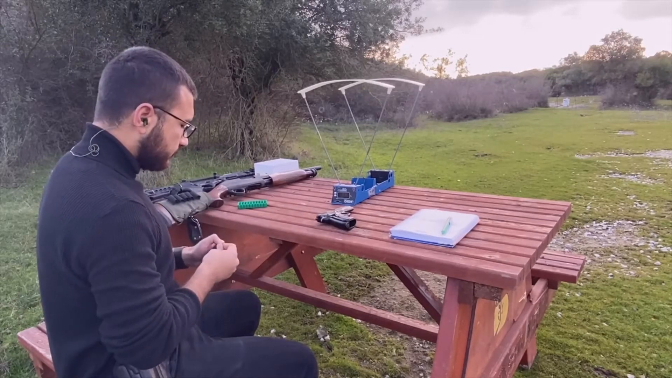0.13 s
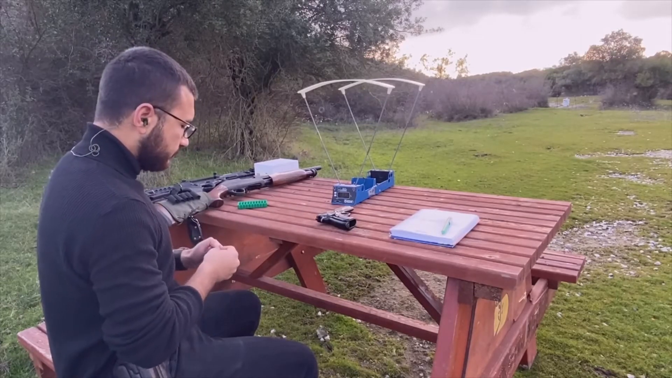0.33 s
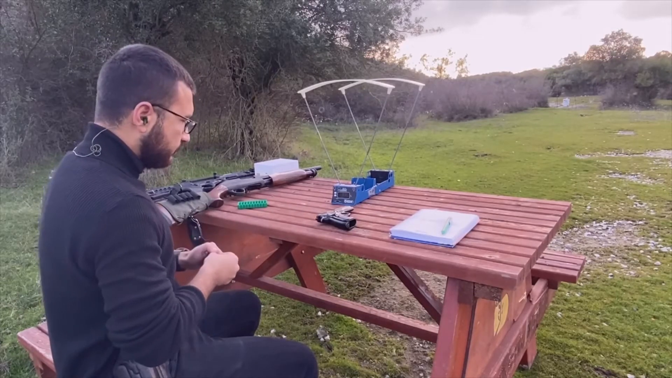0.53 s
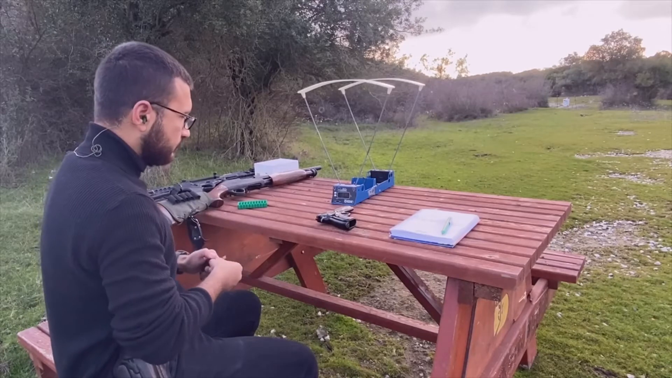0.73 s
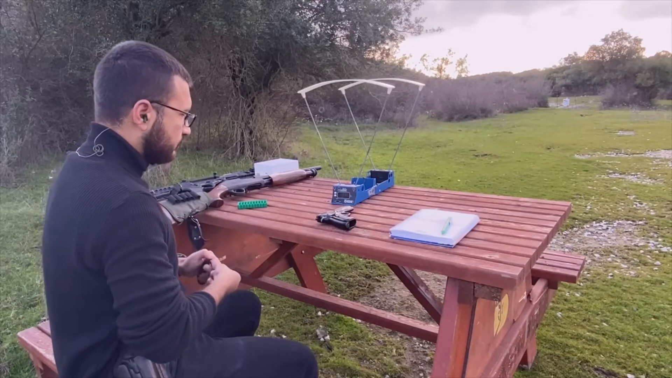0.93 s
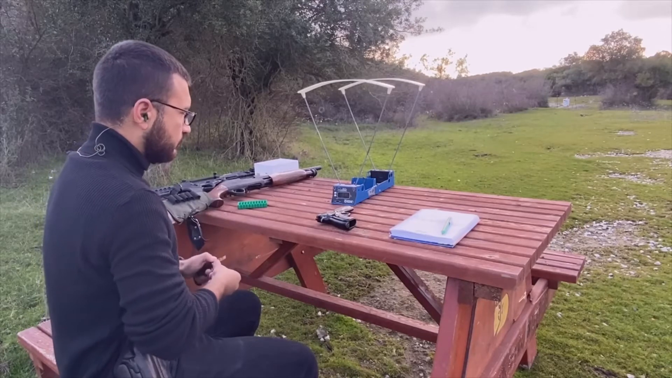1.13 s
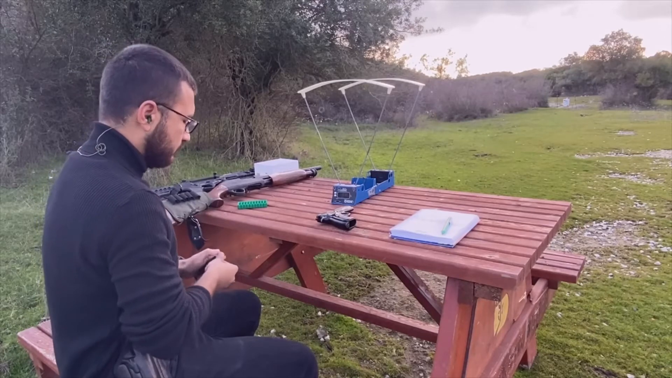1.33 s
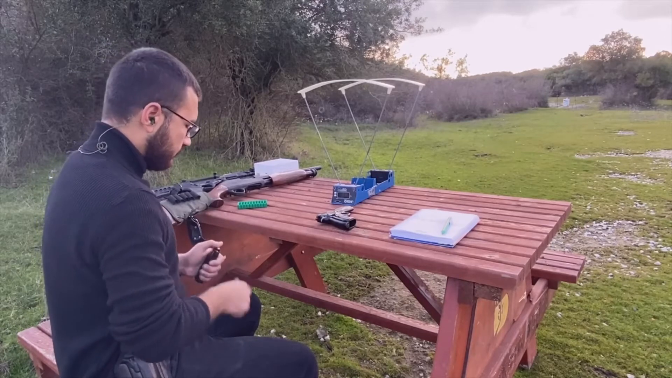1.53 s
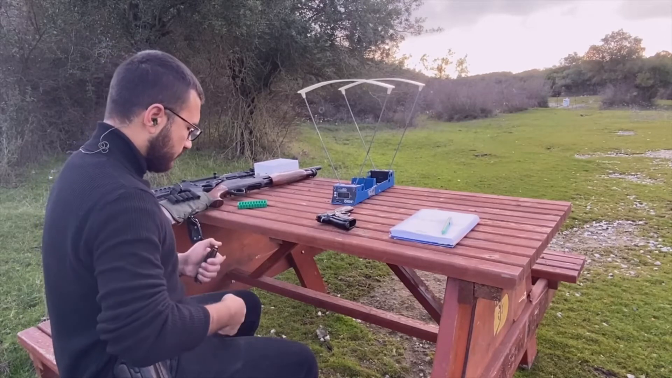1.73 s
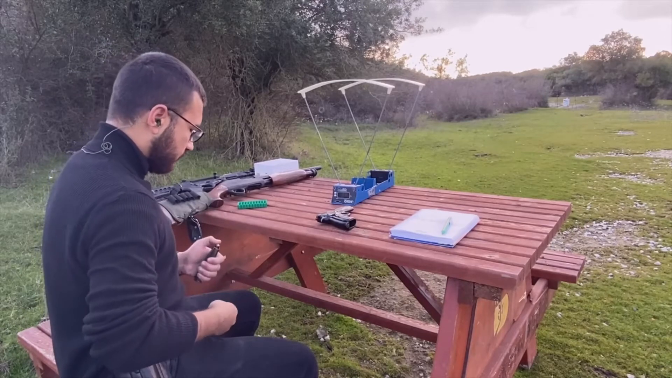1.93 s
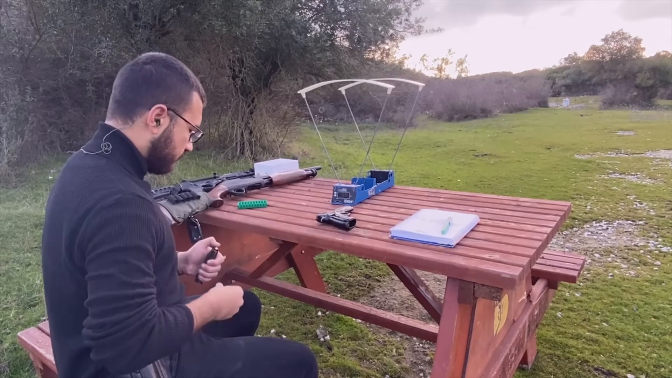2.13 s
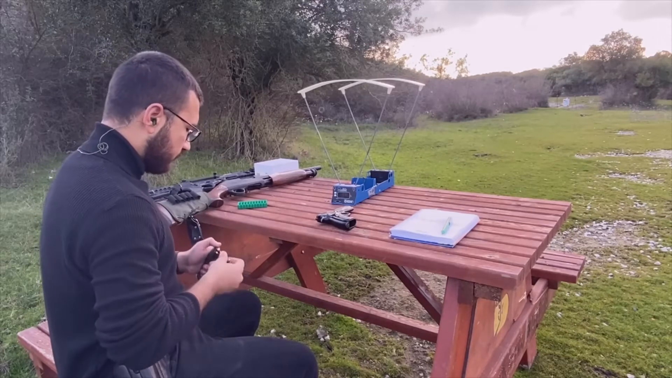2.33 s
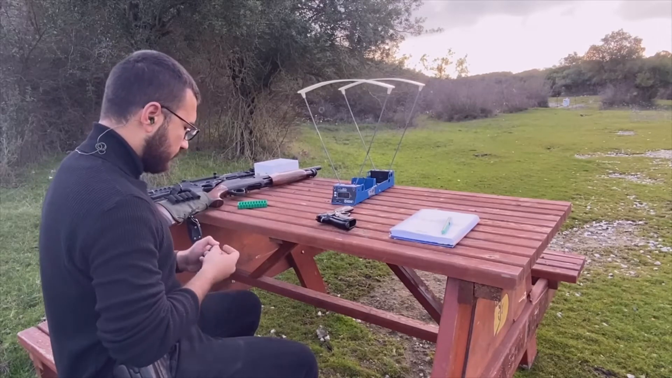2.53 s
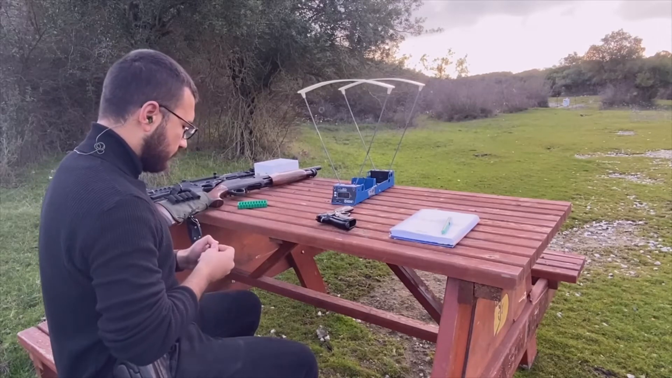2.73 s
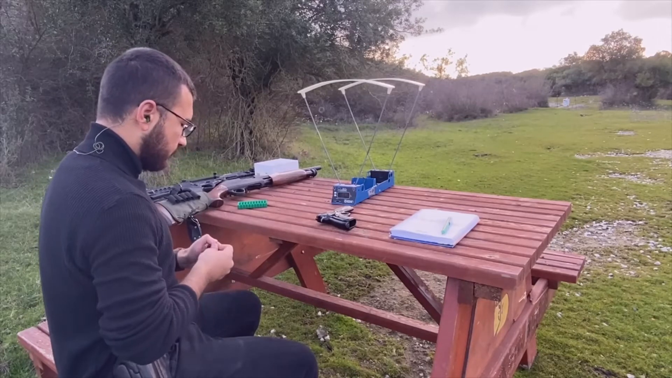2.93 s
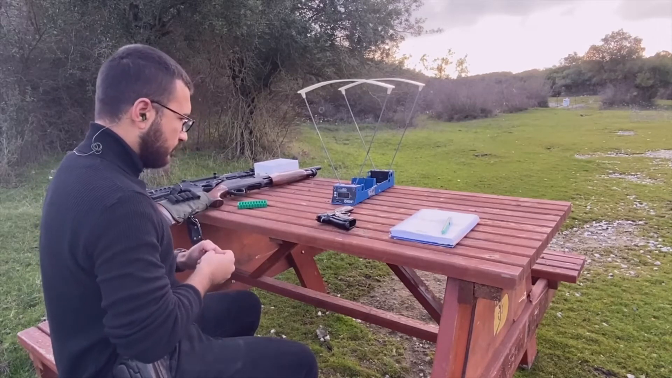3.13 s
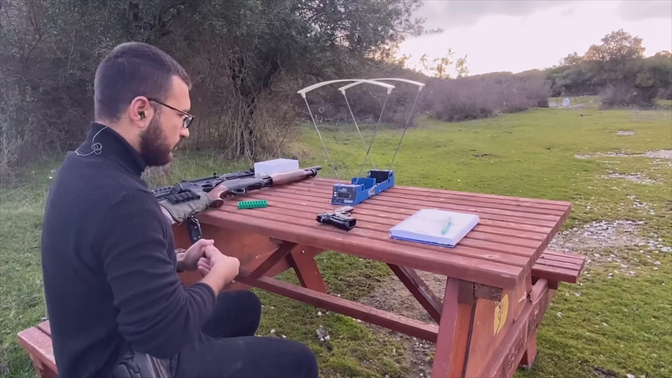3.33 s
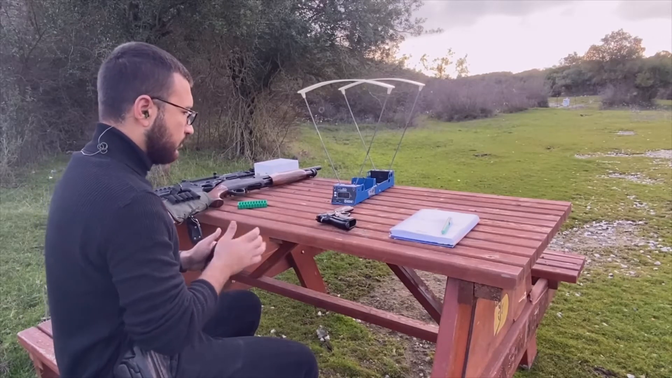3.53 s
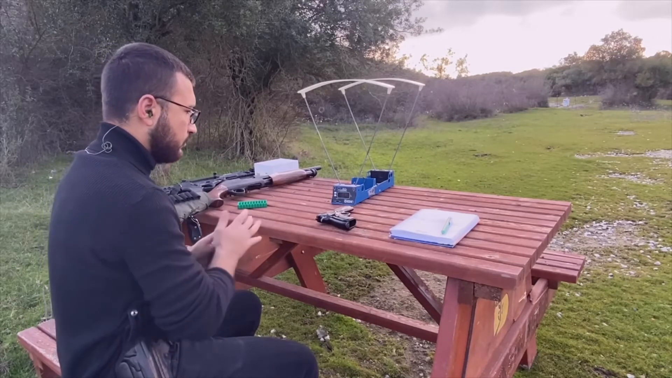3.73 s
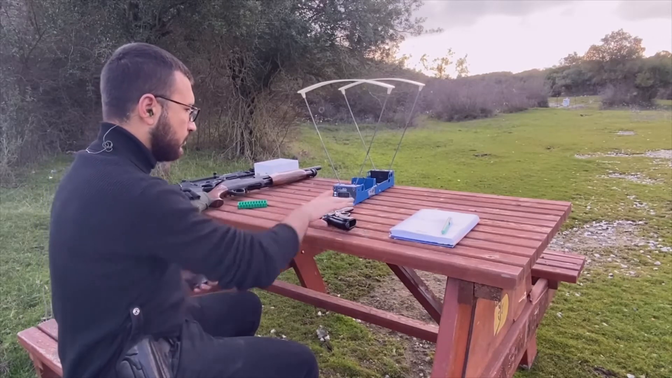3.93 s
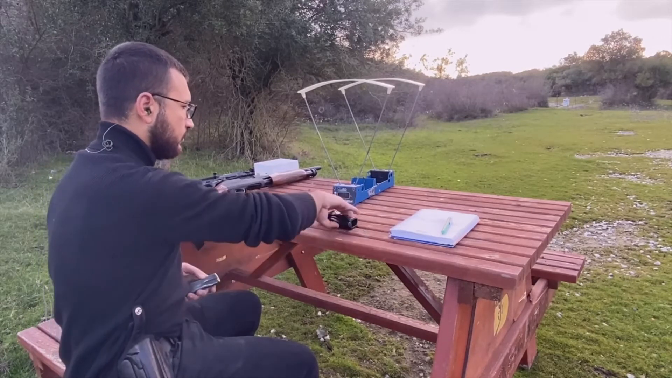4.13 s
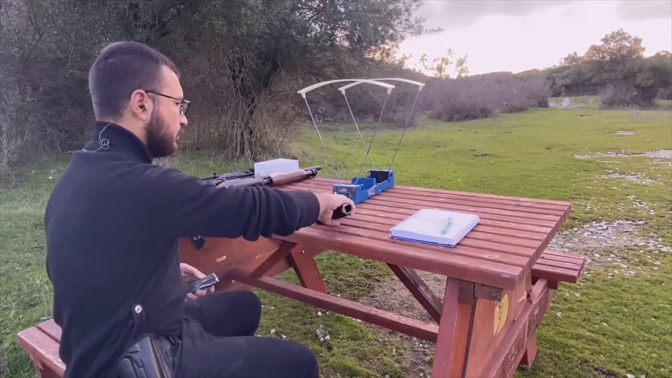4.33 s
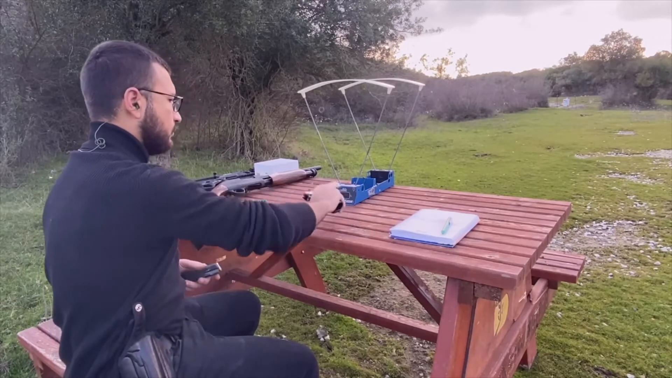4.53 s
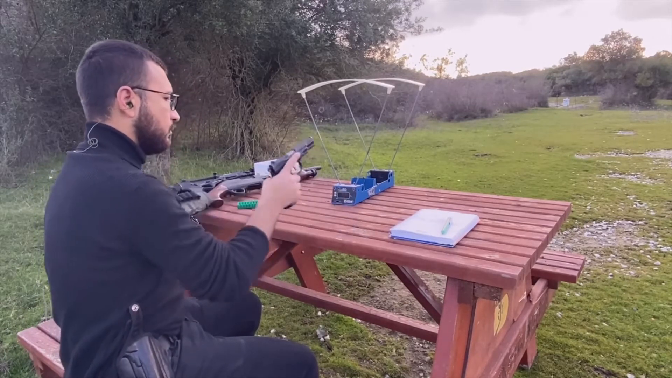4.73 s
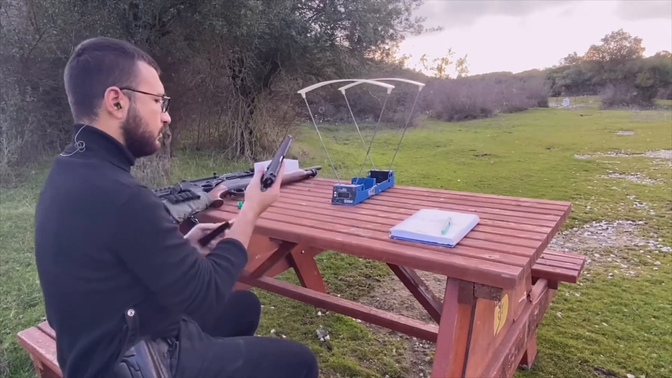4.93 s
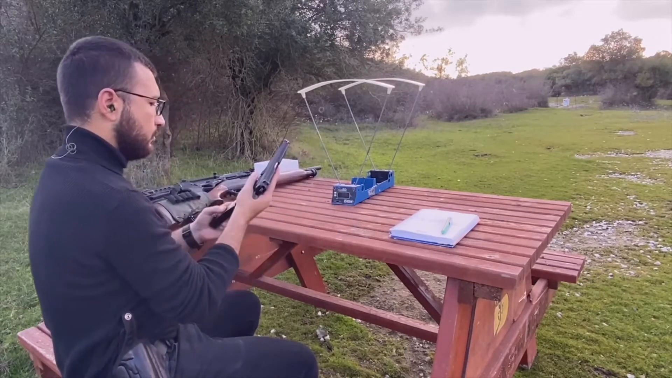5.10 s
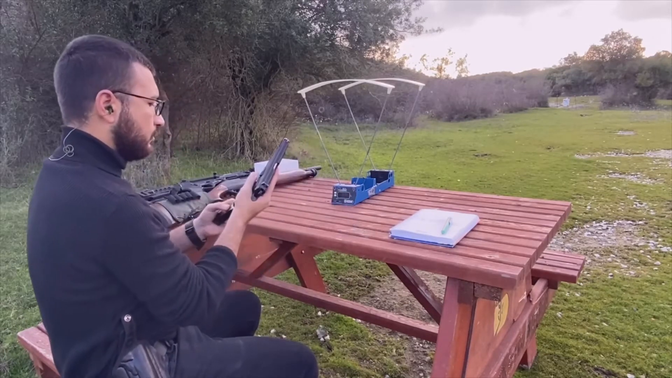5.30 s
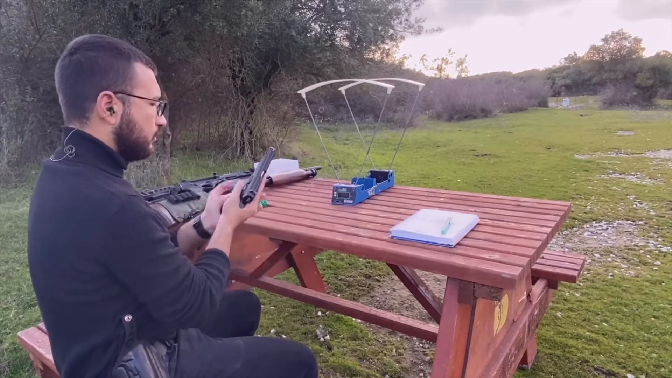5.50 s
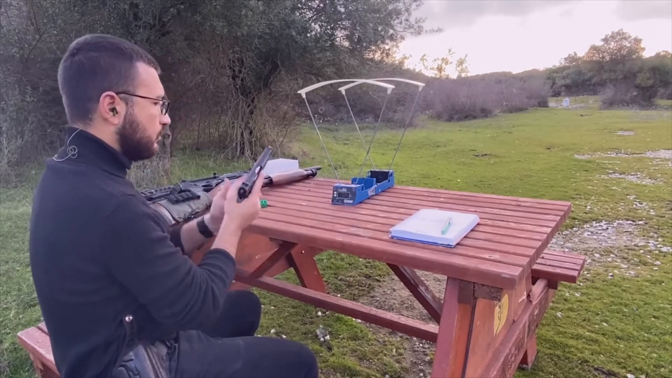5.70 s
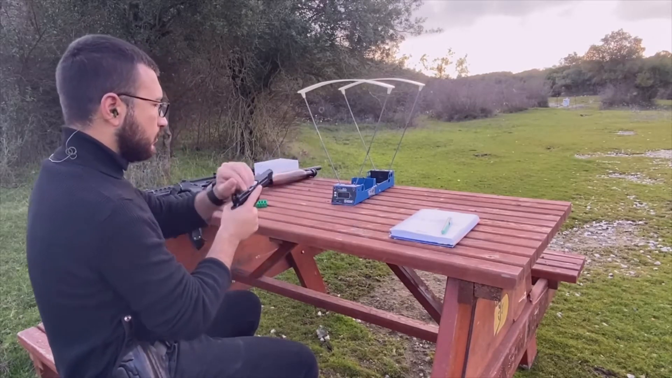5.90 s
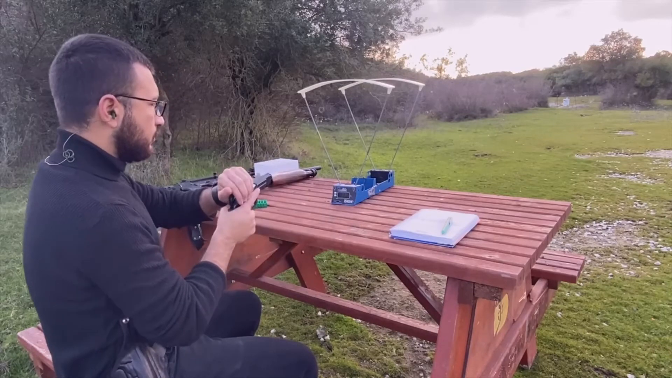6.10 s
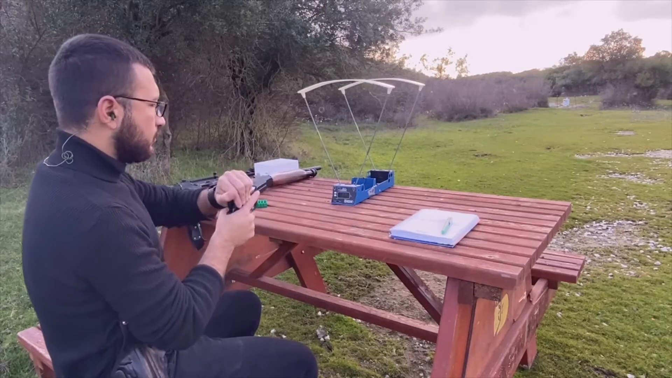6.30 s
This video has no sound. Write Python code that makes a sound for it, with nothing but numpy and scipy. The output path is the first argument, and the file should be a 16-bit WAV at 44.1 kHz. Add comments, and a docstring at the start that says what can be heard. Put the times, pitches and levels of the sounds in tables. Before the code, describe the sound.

At an outdoor wooden table, crisp irregular steel snaps and tiny ticks come from a magazine being loaded by hand. After soft cloth rubbing, a pistol is lifted with a short woody thud; light handling clicks follow, then a brief gritty slide and a loud latch clack, and a last bright snap. Nearby stereo microphone, slightly left, with soft wind rumble and a faint distant bird.

```python
"""Outdoors at a wooden table, cartridges are thumbed into a pistol magazine with sharp steel clicks.
The pistol knocks the table as it is picked up, the magazine scrapes in and latches with a loud clack,
and the slide is gripped. Steel is short noise plus ringing tones; scrapes are noise in a hollow.
Sleeves rustle and wind rumbles on the microphone, both as shaped noise. A bird and a thin whistle sound
far off, and trees scatter a faint echo, made from fading noise."""
import sys
import numpy as np
from scipy import signal
from scipy.fft import rfft, irfft, next_fast_len
from scipy.io import wavfile
from scipy.ndimage import uniform_filter1d

SR = 44100
rng = np.random.default_rng(int(sys.argv[2]) if len(sys.argv) > 2 else 0)


def to_wav(sig):
    """Store sig (one row per channel, or 1-D mono) as 16-bit WAV at the path in sys.argv[1].

    Samples outside -1..1 are clipped; the rate is SR.
    """
    pcm = np.clip(np.atleast_2d(sig), -1, 1) * 32767
    pcm = np.round(pcm).astype(np.int16)
    wavfile.write(sys.argv[1], SR, pcm.T)  # frames by channels


N = 280387

# In every table, t60 is the time a sound takes to fall by 60 dB.
# wind strength, before WIND_BOOST_DB and gusting: (time [s], level [dB])
WIND_LEVELS = [(0.0, -62.5), (0.78, -73), (1.22, -52), (1.47, -61), (2.44, -66.5), (2.85, -74), (3.49, -62),
               (3.96, -76), (4.29, -70.5), (5.47, -71), (6.13, -82), (6.36, -70)]
# colour of the wind rumble: (frequency [Hz], relative level [dB])
WIND_COLOUR = [(15, -35.5), (35, -3.5), (62, 1), (90, -2.5), (140, -17), (200, -23.5), (320, -39),
               (700, -57), (2000, -89.5)]
# single puffs on the microphone: (time [s], peak level [dB], pitch [Hz])
BUFFETS = [(0.018, -49, 90), (.13, -48.5, 88), (0.344, -46.5, 95), (0.41, -40, 85.3), (0.522, -52.5, 65),
           (1.062, -46.5, 74), (1.162, -36, 73), (1.258, -48, 91), (1.912, -43.5, 66), (1.992, -38, 59),
           (2.531, -48, 55), (2.629, -50, 55), (3.346, -42.5, 59), (3.682, -47, 62), (5.487, -45.5, 65),
           (5.664, -42, 56.4), (6.263, -38, 76)]
# colour of the open air: (frequency [Hz], relative level [dB])
AIR_COLOUR = [(60, -27), (150, -2.5), (400, -4.5), (700, -3.5), (1050, -9), (1500, -15), (3000, -18.5),
              (5000, -19), (7500, -22.5), (11000, -26), (13000, -34), (16000, -45)]
# notes of a distant bird: (start [s], length [s], top pitch [Hz], level [dB])
BIRD_NOTES = [(1.694, 0.044, 1230, -75), (1.797, 0.052, 1243, -81), (1.91, 0.053, 1247, -87)]
# cartridges against the magazine: (time [s], level [dB], hollow band near 1.2 kHz [dB], brightness [dB])
MAGAZINE_CLICKS = [(0.05, -50.5, -8, -14.5), (0.4026, -19.5, -4, 1), (0.4442, -34.5, 4.5, 3),
                   (0.523, -59.5, -14, -10), (0.612, -61, -9, -5), (0.662, -42, -2, 7.5),
                   (0.673, -50, -3, -1.5), (0.9042, -30, -4.5, 1), (0.9101, -29, 1, -0.5),
                   (0.9203, -29.5, -10, 1.5), (1.0466, -43.5, -4, -6), (1.196, -60.5, -5, 0.5),
                   (1.246, -59.5, 7, -11), (1.2874, -49.5, 4.5, -11), (1.334, -45.5, 3.5, -7),
                   (1.5829, -55, 5, 2.5), (1.602, -56, 4.5, -11.5), (1.765, -59.5, 17.5, 4),
                   (2.0828, -52.5, 6, -4.5), (2.2717, -43.5, 6.5, -0.5), (2.493, -66, -6, -1),
                   (2.528, -64, 7, -6), (2.7266, -52.5, -1, -15), (2.79, -54, 3, -14),
                   (3.073, -31.5, -13.5, 6.5), (3.186, -35.5, 5.5, -1.5), (3.273, -33.5, -3.5, -8),
                   (3.357, -52.5, 2, -5.5), (3.388, -47.5, -2, -0.5), (3.579, -33, 4, -3.5)]
# tones the magazine rings with: (frequency [Hz], relative level [dB])
MAGAZINE_TONES = [(990, -2.5), (1630, -8), (2330, -3), (2680, -14), (3035, -21), (3280, -4), (3490, 1),
                  (4150, -3.5), (4470, -3), (6580, 3.5), (7080, -1.5), (7940, -6), (8460, -18), (10400, -4),
                  (11150, -5.5), (12020, -12), (14350, -15)]
# colour of the magazine's crack: (frequency [Hz], relative level [dB])
MAGAZINE_COLOUR = [(100, -25), (650, -27), (1020, -4.5), (1350, -15), (2000, -6.5), (2450, -2.5),
                   (3250, 1.5), (4800, -2.5), (6800, -1), (9500, -5), (12500, -2.5), (15800, -13.5)]
# how long hand-damped steel rings: (frequency [Hz], t60 [s])
STEEL_FADE = [(300, 0.033), (1000, 0.056), (3300, .085), (7000, 0.033), (15000, 0.073)]
# how long the trees' echo lasts: (frequency [Hz], t60 [s])
TREES_FADE = [(300, .5), (1500, 0.25), (4500, 0.29), (9000, 0.29), (15000, 0.62)]
# colour of the trees' echo: (frequency [Hz], relative level [dB])
TREES_COLOUR = [(300, 0.0), (2000, -3), (4700, 0.5), (7500, -2.0), (15000, -19.5)]
# arm and finger strokes: (middle [s], length [s], rubbing [dB], swish compared with the rubbing [dB])
STROKES = [(2.832, 0.39, -73.5, -2), (2.976, 0.041, -74, 16), (3.265, 0.74, -72.5, 2),
           (3.674, 0.2, -66.5, -4), (3.92, .26, -68.5, -13), (4.204, 0.14, -69.5, -5.5),
           (4.337, 0.16, -62.5, -1.5), (4.497, .21, -67, -12), (5.599, 0.19, -72, 5)]
# colours of the cloth rub, swish and fine hiss: (frequency [Hz], relative level [dB])
RUB_COLOUR = [(100, -22), (300, 1.5), (600, 0), (1100, 2), (2000, -10), (3500, -24.5), (8000, -39)]
SWISH_COLOUR = [(500, -31), (1500, -4.5), (2500, 0), (4500, -3), (6000, -7), (10000, -12), (15500, -23.5)]
HISS_COLOUR = [(3000, -34), (5600, 0.5), (8200, -0.5), (9500, -13.5), (15500, -21)]
# the pistol knocks the table top: (time [s], level [dB])
KNOCKS = [(4.235, -56.5), (4.279, -53), (4.282, -35)]
# tones of the table top: (frequency [Hz], relative level [dB], t60 [s])
TABLE_TONES = [(124, -6.5, 0.14), (198, 1.5, 0.17), (246, -9.5, 0.15), (354, -30, 0.19), (512, -14, 0.11),
               (670, -4.5, 0.081), (749, 2.5, 0.054), (977, 0, 0.033), (1114, 5, 0.033)]
# how long the duller wood noise lasts: (frequency [Hz], t60 [s])
WOOD_FADE = [(200, 0.36), (700, 0.14), (2500, 0.043)]
# colour of the wood noise: (frequency [Hz], relative level [dB])
WOOD_COLOUR = [(60, -17), (170, 18.5), (420, 6.5), (1000, 7.0), (1600, -13), (2500, -3), (5000, -35)]
# blows on the pistol:
# (time [s], level [dB], hollow band near 1.2 kHz [dB], brightness [dB], contact t60 [s])
PISTOL_CLICKS = [(4.2772, -32, 7.5, -13, 0.012), (4.608, -66, -4, -11.5, 0.043),
                 (4.6948, -56.5, 13.5, -11, 0.053), (5.1408, -37, 16, -5.5, .02),
                 (5.2492, -37, 2.5, -12, .013), (5.4542, -13.5, -12, -1, 0.027),
                 (5.459, -16.5, 7.5, 5, 0.011), (5.475, -9.5, 0.5, 2, 0.017),
                 (5.478, -11.5, 2.5, 2.5, 0.016), (5.598, -66.5, 13, -9.5, 0.013),
                 (5.64, -62, 2.5, -13, 0.021), (6.2593, -63, -21, -20, 0.0097),
                 (6.3082, -52.5, 11, -2, 0.019), (6.3255, -43.5, -13, -10, .04),
                 (6.342, -31.5, 1.5, -4, 0.031), (6.3486, -17, -5, 4, 0.045)]
# tones the pistol rings with: (frequency [Hz], relative level [dB])
PISTOL_TONES = [(810, -8), (1150, -13.5), (1720, -9.5), (2560, -1), (4460, -10.5), (4620, -2.5),
                (4815, -6.5), (5320, -8), (6230, 1), (7870, -10.5), (8760, -15.5), (9800, -12), (11020, -1),
                (11850, -2), (14750, -9.5)]
# colour of the pistol's crack and scrape: (frequency [Hz], relative level [dB])
PISTOL_COLOUR = [(100, -31), (360, -26.5), (520, -13), (830, -7.5), (1150, -9.5), (2000, -3.5), (2550, 0.5),
                 (3400, -5), (4600, -2), (7200, -5), (11200, -0.5), (13200, -4.5), (15500, -4)]
# a faint, thin, far-off whistle: (middle [s], length [s], level [dB])
WHISTLES = [(5.026, 0.52, -84.5), (5.63, .26, -76)]
# colour of the whistle: (frequency [Hz], relative level [dB])
WHISTLE_COLOUR = [(3000, -39.5), (4300, -7.5), (4750, 0.5), (5200, -9.0), (7000, -38)]
# steel slides on steel, the magazine in its well and then the slide:
# (start [s], length [s], level at the end [dB], starting pitch of the hollow [Hz], gritty edge [dB])
SLIDES = [(5.283, 0.2, -40, 888, -11.5), (6.301, .057, -39.5, 2484, 6.5)]
# the magazine catches on its way into the grip: (time [s], level [dB])
CATCHES = [(5.2945, -53.5), (5.341, -52.5), (5.3798, -37.5), (5.415, -42), (5.4302, -37.5), (5.442, -41)]

TIME = np.arange(N) / SR  # seconds through the scene
AGE = np.arange(5120) / SR  # seconds through one blow
WIND_BOOST_DB, GUSTING_DB = 3.5, 3
BUFFET_CYCLES, EDDY_DB = .85, -15  # width of a buffet, and the smaller eddy an octave above it
AIR_DB = -76
RAMP_S = 0.0045  # length of the soft noise ramp before each click
# a press harder than HARD_DB grazes the lips just before it snaps, and the spring rattles after it
HARD_DB, GRAZE_S, GRAZE_DB = -36, .004, -15.5
RATTLE_S, RATTLE_DB, RATTLE_T60_S, RATTLE_BRIGHT_DB = 0.011, -19, .08, -6
# grinding t60 on the feed lips at HARD_DB [s], and how fast it grows with level [per dB]
CONTACT_T60_S, LONGER_PER_DB = 0.012, .012
SLEEVE_HISS_DB = -8.5  # compared with the rubbing
PUSH_DB, SINK_HZ_PER_S, STOP_DB_PER_S = 15, 1000, 599  # a slide grows louder and lower, then stops
STUCK_DB, SLIP_T60_S = -13, 0.07  # friction between catches, and how fast the slip after a catch dies
CATCH_HOLLOW_DB, CATCH_BRIGHT_DB, CATCH_T60_S = 7, -7.5, 0.032
EDGE_HZ = 16100  # upper limit of the sound


def gain_of(db):
    """Turns decibels into a multiplier for the wave."""
    return 10 ** (np.asarray(db) / 20)


def evened(x):
    """Scales to an average strength (rms) of one."""
    return x / np.sqrt(np.mean(x ** 2) + 1e-30)


def unit(x):
    """Scales each wave so its squared samples add up to one."""
    return x / np.linalg.norm(x, axis=-1, keepdims=True)


def read(points, hz):
    """Reads a table between its points, with frequency spaced as the ear hears pitch."""
    f, value = np.transpose(points)
    return np.interp(np.log(hz + 1), np.log(f), value)


def dying(t, t60):
    """Fades by 60 dB in t60 seconds, as freely ringing things do."""
    return np.exp(-np.log(1000) * t / np.maximum(t60, 1e-4))


def swell(middle, length):
    """One smooth rise and fall."""
    return np.cos(np.pi * np.clip((TIME - middle) / length, -.5, .5))


def flutter(rate):
    """A smooth random wander with about `rate` new values a second."""
    knots = rng.standard_normal(8192)
    return np.interp(TIME * rate, np.arange(len(knots)), knots)


def add(mix, s, sound):
    """Lays a sound into the mix at a time."""
    part = mix[max(round(s * SR), 0):][:len(sound)]
    part += sound[:len(part)]


def coloured(x, colour):
    """Filters a sound to the given colour without smearing it ahead of its start."""
    size = next_fast_len(2 * x.shape[-1])
    hz = abs(np.fft.fftfreq(size, 1 / SR))
    log_gain = np.log(gain_of(read(colour, hz)))
    # the Hilbert transform gives the timing that keeps the filter from answering early
    response = np.exp(np.conj(signal.hilbert(log_gain)))
    return np.fft.ifft(np.fft.fft(x, size) * response).real[..., :x.shape[-1]]


def stereo_noise(colour, likeness):
    """Coloured noise, partly shared by left and right."""
    size = next_fast_len(N, True)
    shared = np.clip(likeness, 0, 1)
    a, b = rng.standard_normal((2, size))
    spectrum = rfft([a, shared * a + np.sqrt(1 - shared * shared) * b])
    spectrum *= gain_of(read(colour, np.fft.rfftfreq(size, 1 / SR)))
    return evened(irfft(spectrum, size)[:, :N])


def noise_tail(t60s, size):
    """Noise whose low and high bands each die at their own speed."""
    hz, t, bands = signal.stft(rng.standard_normal(size), SR, nperseg=128)
    fading = bands * dying(t, read(t60s, hz)[:, None])
    tail = signal.istft(fading, SR, nperseg=128)[1]
    return unit(tail[..., :np.atleast_1d(size)[-1]])


def ringing(hz, db, t60, spread_db, channels=1):
    """Fading tones of a struck object; each blow may share its force among them differently."""
    shape = (channels, len(hz))
    strength = gain_of(db + spread_db * rng.standard_normal(shape)) * rng.choice([-1, 1], shape)
    tones = np.sin(2 * np.pi * hz[:, None] * AGE) * dying(AGE, t60[:, None])
    return np.einsum("cm,mt->ct", strength, tones)


def wind():
    """Lumpy turbulence pushes on the microphone as low noise, with single slow puffs."""
    level_db = WIND_BOOST_DB + np.interp(TIME, *np.transpose(WIND_LEVELS)) + GUSTING_DB * flutter(rate=15)
    rumble = stereo_noise(WIND_COLOUR, likeness=0.21) * gain_of(level_db)
    for s, db, hz in BUFFETS:
        near = abs(TIME - s) < .1
        turns = hz * (TIME[near] - s)
        phase = 2 * np.pi * turns + rng.normal(0, 0.53, (2, 1))
        puff = np.exp(-(turns / BUFFET_CYCLES) ** 2)
        rumble[:, near] += gain_of(db) * puff * (np.cos(phase) + gain_of(EDDY_DB) * np.sin(2 * phase))
    return rumble * gain_of([[1.3], [-1.3]])  # a little stronger on the left


def open_air():
    """Quiet open air is steady soft noise."""
    return gain_of(AIR_DB) * stereo_noise(AIR_COLOUR, likeness=0.05)


def presses():
    """Every cartridge contact: light taps alone, hard presses with a graze before and spring rattle after."""
    contacts = []
    for s, db, hollow_db, bright_db in MAGAZINE_CLICKS:
        t60 = CONTACT_T60_S * np.exp(LONGER_PER_DB * (db - HARD_DB))
        contacts.append((s, db, hollow_db, bright_db, t60))
        if db > HARD_DB:
            contacts.append((s - GRAZE_S, db + GRAZE_DB, hollow_db, bright_db, CONTACT_T60_S))
            contacts.append((s + RATTLE_S, db + RATTLE_DB, hollow_db, RATTLE_BRIGHT_DB, RATTLE_T60_S))
    return contacts


def contact(t60, tones, colour, snap_db, dense_db, tones_db):
    """A soft ramp, snap and rebound set off many weak tones and a few strong ones, on three paths."""
    ramp = round(RAMP_S * SR)
    rebound = AGE - rng.uniform(0.003, 0.013)
    press = dying(AGE, t60) + gain_of(-19.5) * dying(abs(rebound), 0.027) * (rebound > 0)
    # tiny slips of very uneven strength
    slip_db = 6.2 * np.minimum(rng.exponential(1, len(AGE)), 4)
    slips = rng.standard_normal((3, len(AGE))) * gain_of(slip_db)
    force = unit(slips * press)
    force[0, round(t60 * SR / 20)] += gain_of(snap_db)
    # the many weak tones blur into a noise tail
    struck = unit(force) + gain_of(dense_db) * noise_tail(STEEL_FADE, force.shape)
    struck = np.pad(struck, ((0, 0), (ramp, 0)))
    struck[:, :ramp] += gain_of(-15.5) * unit(slips[:, -ramp:] * np.linspace(0, 1, ramp))
    hz, db = np.transpose(tones)
    shifted_hz = hz * rng.normal(1, .014, len(hz))
    ring = ringing(shifted_hz, db, read(STEEL_FADE, hz), spread_db=4.0, channels=3)
    ring = np.pad(unit(ring), ((0, 0), (ramp, 0)))
    return unit(coloured(struck, colour)) + gain_of(tones_db) * ring


def steel(clicks, tones, colour, snap_db, dense_db, tones_db, likeness):
    """Steel clicks in the hands: left and right each hear a shared part and their own, left slightly earlier."""
    out = np.zeros((2, N))
    share = np.clip(likeness, 0, 1)
    for s, db, hollow_db, bright_db, t60 in clicks:
        paths = contact(t60, tones, colour, snap_db, dense_db, tones_db)
        sound = np.sqrt(share) * paths[0] + np.sqrt(1 - share) * paths[1:]
        # where the blow lands and how the hand damps it tilt the colour
        tilt = [(400, 0.013), (900, hollow_db), (1500, hollow_db), (2800, 0.012), (5500, 0), (9500, bright_db)]
        sound = coloured(sound, tilt)
        # the level is set by the loudest 3 ms
        loudest = np.sqrt(uniform_filter1d((sound ** 2).mean(0), size=132, mode="constant").max())
        left, right = gain_of(db) * sound / loudest
        add(out[0], s - RAMP_S, left)
        add(out[1], s - RAMP_S + 6 / SR, right)
    return out * gain_of([[.6], [-.6]])  # a little stronger on the left


def trees(x):
    """Foliage scatters sound back as a faint, late, spread-out echo."""
    t = np.arange(SR) / SR
    tails = np.array([noise_tail(TREES_FADE, SR) for side in range(2)])
    tails = coloured(tails * np.minimum(t / 0.035, 1), TREES_COLOUR)
    return gain_of(-41) * signal.oaconvolve(x, unit(tails), axes=1)[:, :N]


def bird():
    """Three faint notes, each a pure tone that arches up and down in pitch and loudness."""
    out = np.zeros(N)
    for s, length, hz, db in BIRD_NOTES:
        arch = np.sin(np.pi * np.arange(0, length, 1 / SR) / length)
        pitch = hz * (1 + 0.023 * (arch - 1))
        add(out, s, gain_of(db) * arch * np.sin(2 * np.pi * np.cumsum(pitch) / SR))
    return out


def cloth():
    """Sleeves rub, swish and hiss with each stroke; the fibres catch and let go in tiny bursts."""
    rub = sum(gain_of(db) * swell(s, length) for s, length, db, _ in STROKES)
    swish = sum(gain_of(db + swish_db) * swell(s, length) for s, length, db, swish_db in STROKES)
    # about 70 fibre catches a second, each fading over 2 ms
    plucks = rng.exponential(1, N) * (rng.random(N) < 70 / SR)
    bursts = signal.lfilter([1], [1, -np.exp(-1 / (.002 * SR))], plucks)
    grain = evened(1 + bursts) * gain_of(1.8 * flutter(rate=35))
    hiss = gain_of(SLEEVE_HISS_DB) * stereo_noise(HISS_COLOUR, likeness=0.089)
    sleeve = stereo_noise(RUB_COLOUR, likeness=0.38) + hiss
    return grain * (rub * sleeve + swish * stereo_noise(SWISH_COLOUR, likeness=0.05))


def table():
    """The planks answer the pistol with a short wooden thud of fading tones and dull noise."""
    out = np.zeros(N)
    for s, db in KNOCKS:
        planks = ringing(*np.transpose(TABLE_TONES), spread_db=0.0)[0]
        wood = coloured(noise_tail(WOOD_FADE, len(AGE)), WOOD_COLOUR)
        add(out, s, gain_of(db) * (gain_of(-4.5) * planks + gain_of(17.5) * wood))
    return out


def whistle():
    """A narrow, airy band of noise far away swells and fades."""
    band = stereo_noise(WHISTLE_COLOUR, likeness=0.26)
    return band * sum(gain_of(db) * swell(s, length) for s, length, db in WHISTLES)


def resonate(x, hz, width):
    """A hollow that favours one pitch, following the curve hz."""
    turn = np.exp(2j * np.pi * np.cumsum(hz * np.ones(N)) / SR)
    r = np.exp(-np.pi * width / SR)
    # shift the pitch down to zero, smooth, then shift it back up
    return 2 * (turn * signal.lfilter([1 - r], [1, -r], x / turn)).real


def scrape():
    """Gritty friction sounds the grip's hollow, most after each catch, sinking in pitch as the push grows."""
    grit = gain_of(2.5 * flutter(rate=900) + 2.5 * flutter(rate=140))
    rub = evened(stereo_noise(PISTOL_COLOUR, likeness=0.3) * grit)
    slips = sum((TIME > s) * dying(abs(TIME - s), SLIP_T60_S) for s, _ in CATCHES)
    slipping = gain_of(STUCK_DB) + slips
    out = np.zeros(N)
    for s, length, db, start_hz, edge_db in SLIDES:
        moving = np.clip(TIME - s, 0, length)
        hz = start_hz - SINK_HZ_PER_S * moving
        push_db = PUSH_DB * (1 - moving / length)
        stop_db = STOP_DB_PER_S * np.maximum(TIME - s - length, 0)
        level = (TIME > s) * slipping * gain_of(db - push_db - stop_db)
        # each hollow is applied twice to sharpen it
        low = evened(resonate(resonate(rub, hz, 190), hz, 190))
        high = evened(resonate(resonate(rub, 2.3 * hz, 480), 2.3 * hz, 480))
        out = out + level * (low + gain_of(-8) * high + gain_of(edge_db) * rub)
    return out


def scene():
    """Magazine and pistol in the hands, with the outdoors around them."""
    magazine = steel(presses(), MAGAZINE_TONES, MAGAZINE_COLOUR,
                     snap_db=-12.5, dense_db=-1.5, tones_db=-5.0, likeness=0.32)
    catches = [(s, db, CATCH_HOLLOW_DB, CATCH_BRIGHT_DB, CATCH_T60_S) for s, db in CATCHES]
    pistol = steel(PISTOL_CLICKS + catches, PISTOL_TONES, PISTOL_COLOUR,
                   snap_db=-10.5, dense_db=-9.5, tones_db=-8, likeness=0.22)
    pistol = pistol + scrape() + table()
    # the magazine's clicks set off a stronger echo from the trees
    echo = trees(gain_of(10.5) * magazine + pistol)
    return magazine + pistol + echo + cloth() + wind() + open_air() + bird() + whistle()


def record(dry):
    """Flattens peaks beyond 0.9, then filters away what lies above EDGE_HZ."""
    low_pass = signal.firwin(401, EDGE_HZ, window=("kaiser", 9), fs=SR)
    return signal.oaconvolve(np.clip(dry, -.9, .9), low_pass[None], "same", axes=1)


dry = scene()
out = record(dry)
to_wav(out)
```